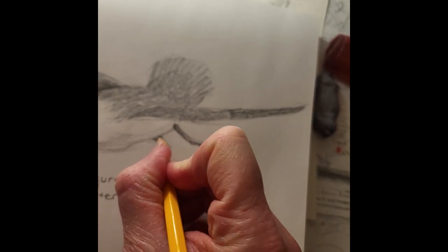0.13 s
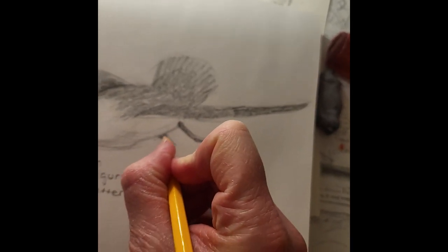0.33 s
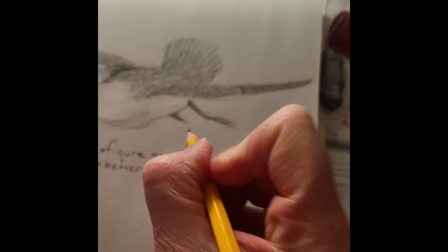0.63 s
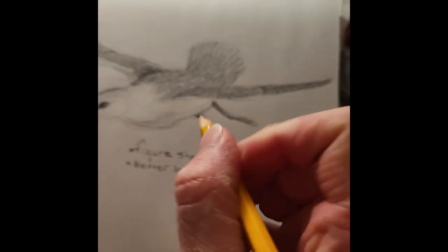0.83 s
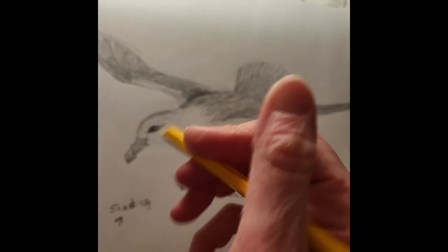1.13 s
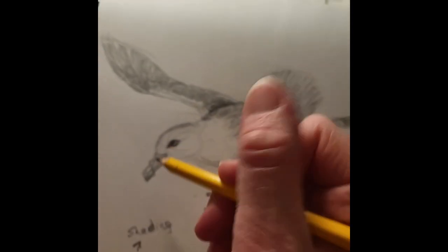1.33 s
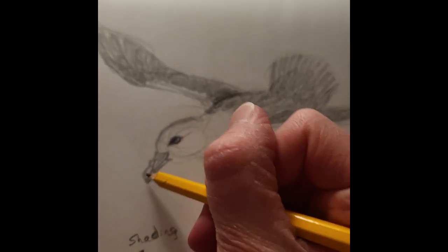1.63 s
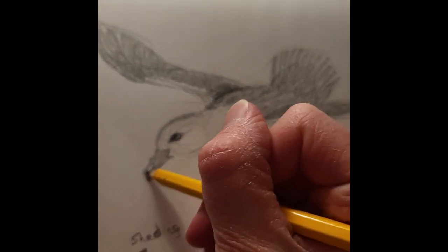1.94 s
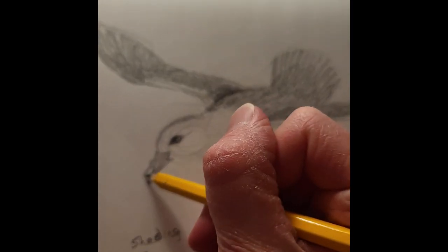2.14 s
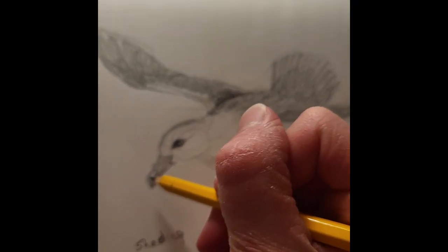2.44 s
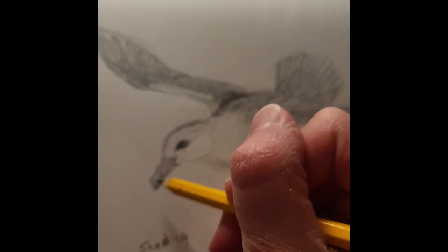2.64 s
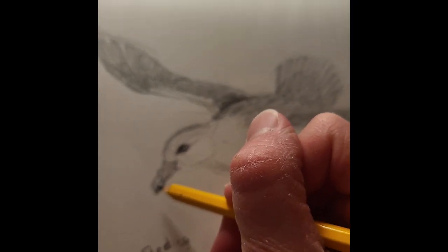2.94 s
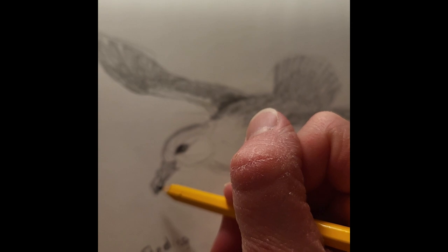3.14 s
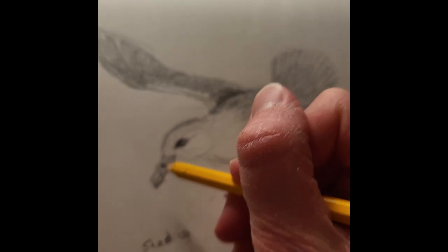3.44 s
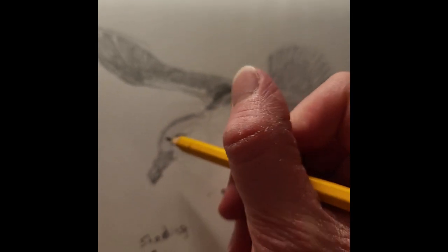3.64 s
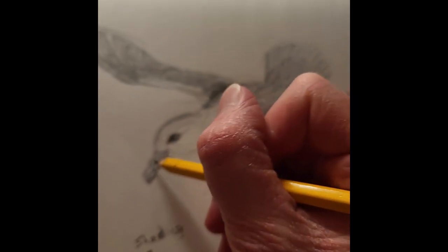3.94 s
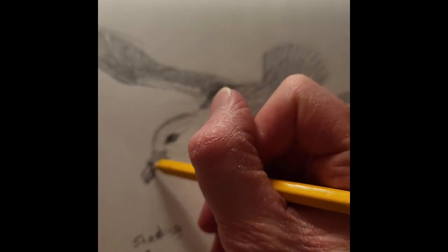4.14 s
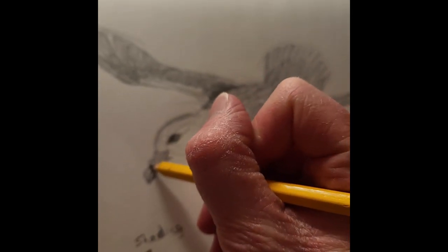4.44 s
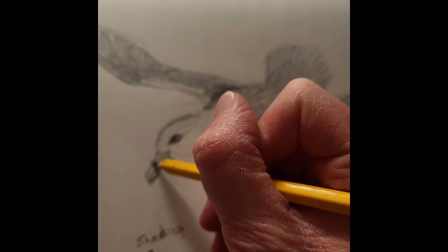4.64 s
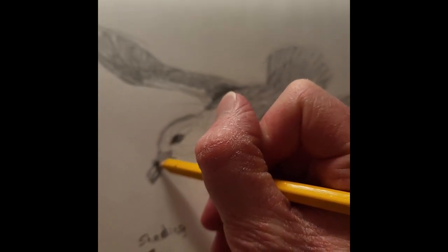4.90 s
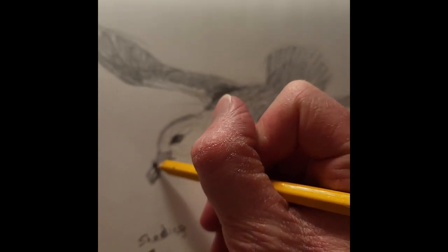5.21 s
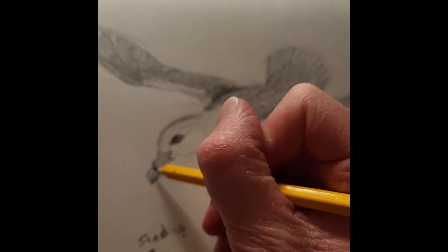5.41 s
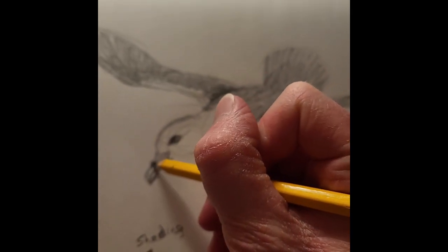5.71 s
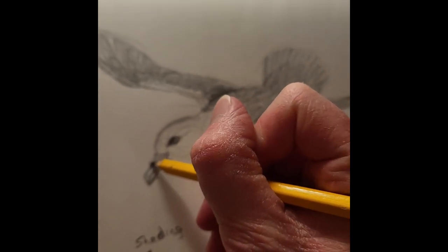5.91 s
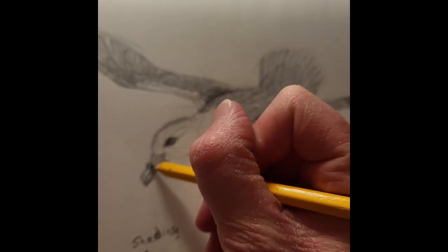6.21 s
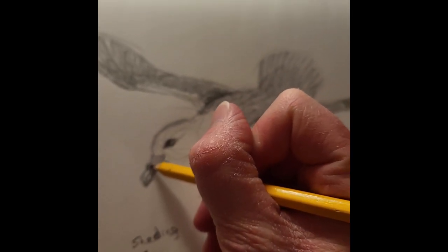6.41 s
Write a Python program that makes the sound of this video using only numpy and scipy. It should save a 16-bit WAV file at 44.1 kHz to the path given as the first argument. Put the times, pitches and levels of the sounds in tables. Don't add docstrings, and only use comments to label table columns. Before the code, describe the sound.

A pencil scratches lightly in brief uneven bursts on sketch paper, skin sliding between them, while an appliance hums and rumbles in the room.

```python
import sys
import numpy as np
from scipy import signal
from scipy.fft import rfft, irfft, next_fast_len
from scipy.io import wavfile
from scipy.ndimage import map_coordinates

SR = 44100
rng = np.random.default_rng(int(sys.argv[2]) if len(sys.argv) > 2 else 0)


def digitize_waveform(pressure):
    field = np.atleast_2d(pressure).T
    bounded = np.clip(field, -1, 1)
    quanta = np.round(bounded * 32767).astype(np.int16)
    wavfile.write(sys.argv[1], SR, quanta)


def undo_db(level):
    steps = np.asarray(level, float) / 20
    return 10 ** steps


N = 289296

# [f/Hz, level/dB]
PAGE_COLOUR = [(2000, -40), (2600, -3), (4000, -7.5), (5000, -2.5), (5800, -5.5), (6400, -2.5), (7500, 1.5),
               (8300, -6.5), (9200, -8.5), (11500, -14), (15500, -13), (17000, -40)]


def unit(x):
    return x / np.sqrt(np.mean(x ** 2) + 1e-20)


def along(points, hz):
    f, value = np.transpose(points)
    return np.interp(np.log(hz + 1), np.log(f + 1), value)


def wobble(rate):
    points = rng.standard_normal(int(N * rate / SR) + 4)
    return map_coordinates(points, [np.arange(N) * rate / SR])


def filtered(x, response):
    m = next_fast_len(N + SR // 2)
    return irfft(rfft(x, m) * response(np.fft.rfftfreq(m, 1 / SR)), m)[..., :N]


def lean(db):
    return np.array([undo_db(db / 2), undo_db(-db / 2)])


def swells(rows, width, shape):
    t = np.arange(N) / SR
    return sum(undo_db(db) * np.exp(-np.abs((t - s) / (width * length)) ** shape) for s, db, length in rows)


def ring(f, hz, width):
    return (1j * f * width / (hz * hz - f * f + 1j * f * width)) ** 2


def bump(f, hz, width):
    return 1 / (1 + (2 * (f - hz) / width) ** 2)


def grit(echo):
    size_db = 2.5 * rng.exponential(size=N) + 0.97 * wobble(250)
    direct = rng.standard_normal(N) * undo_db(size_db)
    return unit(direct) + echo * rng.standard_normal((2, N))


def strokes(rows, resonances):
    t, speed, bright = np.arange(N) / SR, np.zeros(N), np.zeros(N)
    for s, db, length, bright_db in rows:
        swell = undo_db(db) * np.exp(-np.abs((t - s) / (0.41 * length)) ** 1.3)
        speed += swell
        bright += swell * undo_db(bright_db)
    rub = grit(echo=0.68)
    out = np.zeros((2, N))
    for hz, width, left_db, right_db in resonances:
        drive = speed if hz < 8500 else bright
        flicker = undo_db(1.1 * wobble(80))
        ringing = filtered(drive * rub * flicker, lambda f: ring(f, hz, width))
        out += undo_db([[left_db], [right_db]]) * ringing
    return undo_db(16.5) * out


def upright_strokes():
    # [centre t/s, level/dB, length/s, brightness/dB]
    rows = [
        (.025, -71, 0.077, 0),
        (.10, -80, 0.041, 2),
        (.185, -72.5, 0.058, 1.5),
        (.235, -81, 0.036, 4),
        (.548, -70, 0.056, 3.5),
    ]
    # [f/Hz, width/Hz, left/dB, right/dB]
    resonances = [(2560, 1700, -7, 1.5), (5200, 830, 0, -7), (6760, 1900, -8, 3), (9640, 920, -3, -8),
                  (12900, 1300, -4, -14), (13800, 1600, -1, -2), (15200, 1200, -9, -5)]
    return strokes(rows, resonances)


def flat_strokes():
    # [centre t/s, level/dB, length/s, brightness/dB]
    rows = [(3.38, -84, .06, -1), (3.63, -83, 0.17, -1), (4.0, -92.5, .05, 2), (4.13, -90, .04, -1),
            (4.34, -84.5, .04, 1), (4.44, -88, .03, 7), (4.535, -77.5, 0.046, 1), (4.69, -74, 0.062, 1.5),
            (4.74, -91, 0.036, -3), (4.79, -91, 0.056, 2), (5.05, -87, .04, -2), (5.325, -80.5, 0.044, 1),
            (5.41, -83, .03, 1), (5.88, -85, .04, 0), (5.985, -81.5, 0.07, 1), (6.07, -91, .04, -2),
            (6.195, -81.5, 0.047, 2), (6.26, -86, 0.054, 5), (6.31, -89, 0.043, 4),
            (6.365, -76, 0.059, 1.5), (6.44, -73, 0.055, 0), (6.52, -86, .06, 4)]
    # [f/Hz, width/Hz, left/dB, right/dB]
    resonances = [(4800, 790, -2, 6), (6700, 510, -2, -8), (7470, 1600, -0.5, 4), (10200, 2500, -5, -2.5),
                  (12800, 1400, -3, -7), (15100, 1300, -12, -1)]
    return strokes(rows, resonances)


def ticks():
    # [t/s, peak level/dB, left-right difference/dB, f/Hz]
    contacts = [
        (0.626, -53, -18, 7620),
        (0.9014, -63, -4.0, 6450),
        (1.8332, -57, -6, 7200),
        (2.2013, -51, -5.0, 7400),
        (2.2844, -62, -2.5, 4560),
        (4.235, -55, -6, 7800),
        (4.3026, -48.5, -1.5, 5400),
        (4.9097, -63, -1, 7080),
        (5.5982, -55, -2.5, 7600),
        (6.2594, -62, -1.5, 4270),
    ]
    out, t = np.zeros((2, N + 400)), np.arange(400) / SR
    for s, db, pan_db, hz in contacts:
        tone = np.sin(2 * np.pi * hz * t) * undo_db(-60 * t / 0.0044)
        noise = 0.83 * rng.standard_normal(400) * undo_db(-60 * t / 0.0071)
        start = round(s * SR)
        out[:, start:start + 400] += lean(pan_db)[:, None] * undo_db(db - 1.5) * (tone + noise)
    return filtered(out[:, :N], lambda f: undo_db(0.69 * along(PAGE_COLOUR, f)))


def hand_brush():
    # [centre t/s, level/dB, length/s]
    slides = [(.63, -75, 0.1), (.73, -77, 0.11), (.84, -75, 0.14), (1.055, -71.5, 0.12),
              (1.27, -77.5, 0.17), (1.36, -79, 0.12), (1.53, -81, 0.11), (1.8, -82, .2), (2.0, -79.5, 0.17),
              (2.2, -77.5, .22), (2.45, -86, 0.17), (2.9, -89, .5), (1.5, -85.5, 1.8)]
    # [f/Hz, level/dB]
    shade = [(4000, -1), (6000, -8), (7500, -18), (15000, -11)]
    rub = grit(echo=1.0) * undo_db(2.3 * wobble(25.1))
    skin = filtered(rub, lambda f: undo_db(along(PAGE_COLOUR, f) + [along(shade, f), 0 * f]))
    return undo_db(5.0) * swells(slides, width=0.56, shape=1.5) * unit(skin)


def mains_hum():
    # [f/Hz, level/dB, left-right difference/dB, left lead/rad, unsteadiness/dB]
    harmonics = [
        (119.8, -42, 6, 0.17, 0.3),
        (239.5, -51.5, 1, 0.38, 0.5),
        (359, -62, 0.5, .06, 3.5),
        (474, -69, 7, -0.33, -1.5),
    ]
    t = np.arange(N) / SR
    out = np.zeros((2, N))
    for hz, db, pan_db, lead, loose_db in harmonics:
        level = undo_db(db + 4 + loose_db * wobble(4))
        phase = 2 * np.pi * hz * t + [[lead / 2], [-lead / 2]]
        out += lean(pan_db)[:, None] * level * np.sin(phase)
    return out


def far_motor():
    # [centre t/s, level/dB, length/s]
    surges = [
        (.6, -58, 0.56),
        (1.45, -54, 0.4),
        (2.0, -52, 0.35),
        (2.95, -48, 0.8),
        (4.02, -43.5, 0.49),
        (4.95, -47.5, 0.65),
        (5.5, -53, 0.32),
        (6.05, -50, 0.99),
    ]
    idle_hz, climb_hz_per_s, full_hz, hunt_hz = 71.24, 3.4, 87.3, 1.0
    t = np.arange(N) / SR
    pitch_hz = np.minimum(idle_hz + climb_hz_per_s * t, full_hz) + hunt_hz * wobble(2.43)
    tone = np.sin(2 * np.pi * np.cumsum(pitch_hz) / SR)
    return lean(2.1)[:, None] * undo_db(1.5) * swells(surges, width=0.57, shape=3.5) * tone


def turned_to_room():
    # [t/s, share 0-1]
    swing = [
        (0, 0.3),
        (.6, 0.8),
        (1.1, 0.63),
        (2.4, 0.01),
        (6.56, 0.13),
    ]
    return np.interp(np.arange(N) / SR, *np.transpose(swing))


def fan_whine():
    # [centre t/s, level/dB, length/s]
    meetings = [(0, -57.5, 0.26), (.29, -61, 0.22), (.6, -72, 0.41), (.84, -64, 0.13), (1.12, -67.5, 0.34),
                (1.45, -69, 0.23), (1.8, -75, .3), (2.8, -74, 0.18), (4.9, -68, 0.35), (5.29, -59, 0.12),
                (5.6, -62, 0.23), (5.8, -62, 0.23)]
    whine_hz, drift_hz, fastest_s, drift_period_s = 862, 3.51, 3.2, 5.0
    steady_db, turned_left_db, fading_db = -70.5, 11.5, 0.5
    t = np.arange(N) / SR
    pitch_hz = whine_hz + drift_hz * np.cos(2 * np.pi * (t - fastest_s) / drift_period_s)
    level = undo_db(steady_db) + swells(meetings, width=0.44, shape=1.8)
    fading = undo_db(2.5 + 1.9 * wobble(11) + fading_db * np.array([wobble(3.6), wobble(5)]))
    slip = 0.77 * wobble(9) + np.array([0.61 * wobble(1.58), 0.59 * wobble(1.4)])
    tone = np.sin(2 * np.pi * np.cumsum(pitch_hz) / SR + slip)
    return lean(turned_left_db * turned_to_room()) * level * fading * tone


def port_noise(gain):
    # [f/Hz, likeness 0-1]
    alike = [(30, .93), (60, 0.84), (270, 1), (450, 0.66), (740, 0.37), (1200, 0)]

    def angle(f):
        return np.arccos(np.clip(along(alike, f), -1, 1)) / 2

    common, apart = rng.standard_normal((2, N))
    same = filtered(common, lambda f: gain(f) * np.cos(angle(f)))
    return same + filtered(apart, lambda f: gain(f) * np.sin(angle(f)) * [[1], [-1]])


def room_rumble():
    # [f/Hz, level/dB]
    rumble = [(12, -60), (20, -31), (65, -12), (119, -5), (143, -4.5), (168, -12.5), (247, -10.5),
              (304, -17.5), (375, -13), (700, -40), (910, -56), (1540, -120)]
    # [f/Hz, width/Hz, level/dB]
    modes = [(59.3, 4.4, 8), (63, 4.2, -7), (87, 25, -1), (141.2, 3.9, 7), (145, 11.4, -16.5),
             (162.7, 13, 7), (173, 7, -5.5), (191.2, 29, 5.5), (206, 2.5, -5), (212, 8, 0.5),
             (234.2, 6.4, -12), (251.5, 9.1, 10.5), (267.8, 11, 7), (299, 16.4, -2), (311, 13.4, 7),
             (325, 9.8, 0), (351.5, 24, 4.5), (397.4, 28, 4.5), (414, 12, -1), (442, 12, -1.5),
             (440, 7.4, 2), (460.8, 19.5, 9.5), (487, 10.4, 10), (643, 32, 6)]
    # [f/Hz, left-right difference/dB]
    balance = [(60, 0.5), (110, 11.5), (200, 0), (380, -1), (700, -8), (1290, -0.5), (2380, 4.5),
               (4400, -1), (8120, -6.5), (15000, -4)]

    def gain(f):
        standing_db = sum(db * bump(f, hz, width) for hz, width, db in modes)
        return lean(along(balance, f)) * undo_db(along(rumble, f) + standing_db)

    return undo_db(-44 + 0.67 * wobble(9)) * unit(port_noise(gain))


def room_air():
    # [f/Hz, level/dB per Hz]
    left = [(350, -110), (550, -88.5), (900, -86.5), (1400, -89), (1700, -92), (2500, -96), (2850, -101),
            (3400, -101.5), (4300, -106), (5200, -107), (5700, -113), (7000, -116), (8300, -123),
            (10000, -135)]
    right = [(350, -110), (550, -89), (900, -86), (1400, -92), (2050, -92.5), (2500, -103), (3000, -108),
             (5200, -109), (5700, -115), (6500, -110), (7600, -107), (8150, -110), (8500, -120),
             (11000, -135)]
    # [f/Hz, width/Hz, left/dB, right/dB]
    comb = [(620, 82, 7, 5), (786, 91, 1, 2.5), (1000, 55, 2.5, 3.5), (1020, 185, -2.5, -5.5),
            (1350, 63, -1.5, -2.5), (1390, 120, 0.5, 4.5), (1430, 110, 0, -2), (1590, 80, -4.5, 3.5),
            (2140, 79, 4.5, -2), (2210, 98, -2, -0.5), (2700, 120, -1.5, -3), (3270, 200, 1, -6)]
    # [f/Hz, level/dB per Hz]
    open_right = [(900, -112), (1200, -89), (1380, -82.5), (1560, -96), (1750, -108), (2100, -110),
                  (2500, -100), (3000, -108), (3350, -105), (4000, -109), (5000, -125)]

    def air_gain(f):
        reflections_db = sum(np.outer(dbs, bump(f, hz, width)) for hz, width, *dbs in comb)
        return undo_db([along(left, f), along(right, f)] + reflections_db)

    tail_t = np.arange(SR // 4) / SR
    tail = rng.standard_normal((2, SR // 4)) * undo_db(-60 * tail_t / 0.19)
    source = rng.standard_normal((1, N + SR // 4))
    fan = unit(signal.fftconvolve(source, tail, "valid", axes=1)[:, :N])
    air = port_noise(air_gain) + filtered(fan, lambda f: 0.71 * air_gain(f) / (1 + (f / 4000) ** 4))
    opened = filtered(rng.standard_normal((2, N)), lambda f: undo_db(along(open_right, f) + [[-9], [0]]))
    extra = turned_to_room() * opened
    return np.sqrt(SR / 2) * (undo_db(-0.5 + 0.19 * wobble(1.55)) * air + extra)


def scene():
    page = upright_strokes() + flat_strokes() + ticks() + hand_brush()
    machines = mains_hum() + far_motor() + fan_whine()
    return page + machines + room_rumble() + room_air()


def top_cut(x):
    return signal.sosfilt(signal.butter(12, 15745, fs=SR, output="sos"), x)


def record(dry):
    shared, apart = rng.standard_normal((2, N))
    hiss = undo_db(-78.5) * shared + undo_db(-88.5) * apart * [[1], [-1]]
    edge = signal.ellip(10, .1, 30, 15730, fs=SR, output="sos")
    soft_end = np.minimum(1, np.arange(N)[::-1] / 120)
    return top_cut(soft_end * signal.sosfiltfilt(edge, dry + hiss))


dry = scene()
out = record(dry)
digitize_waveform(out)
```